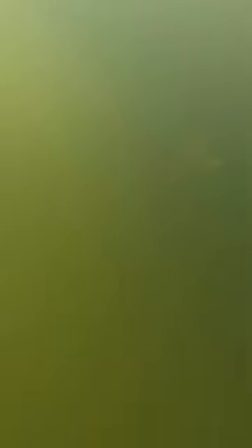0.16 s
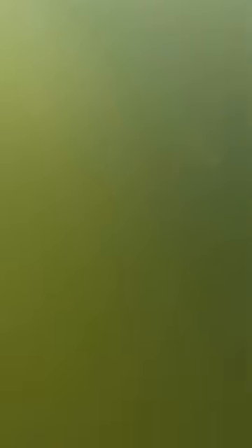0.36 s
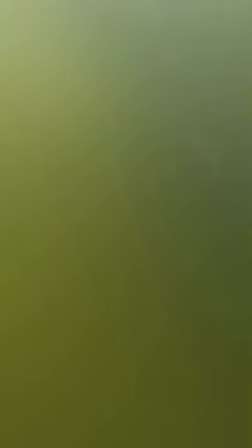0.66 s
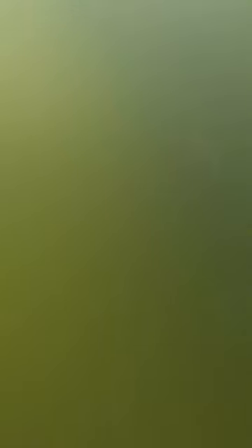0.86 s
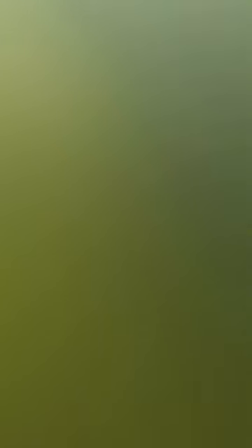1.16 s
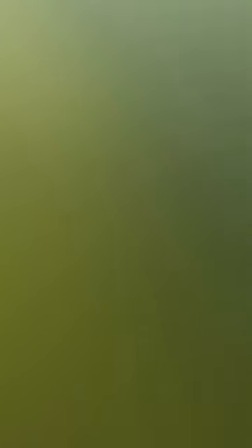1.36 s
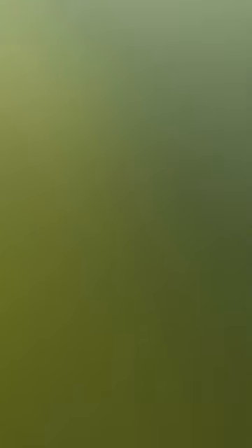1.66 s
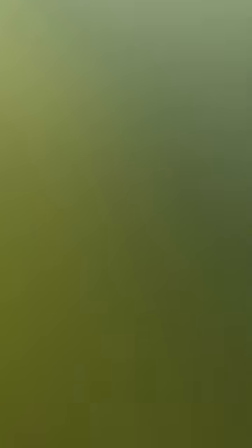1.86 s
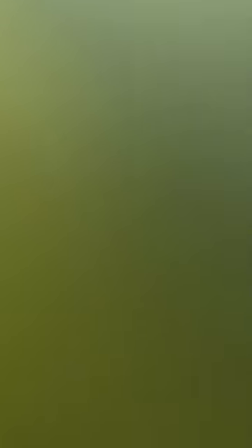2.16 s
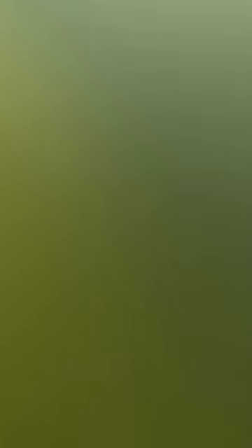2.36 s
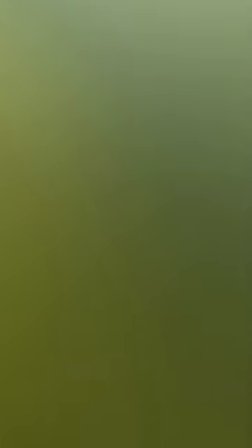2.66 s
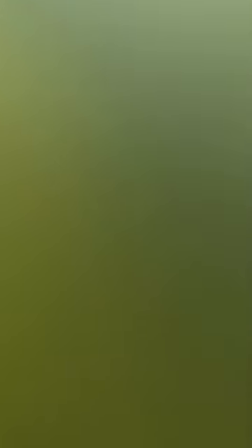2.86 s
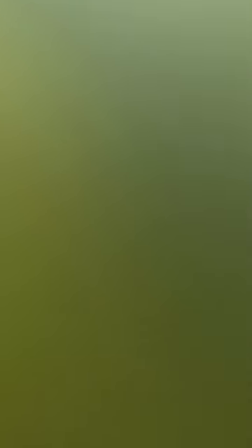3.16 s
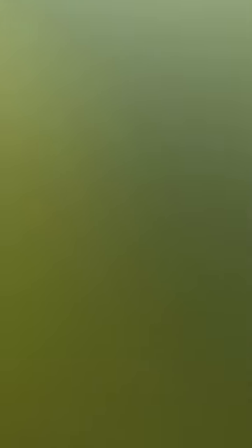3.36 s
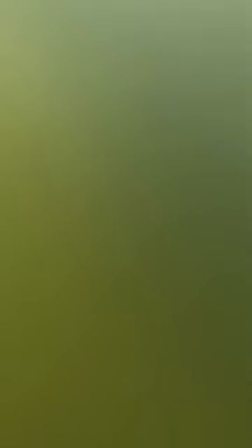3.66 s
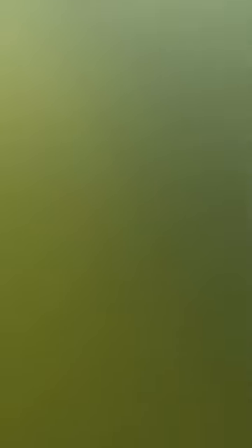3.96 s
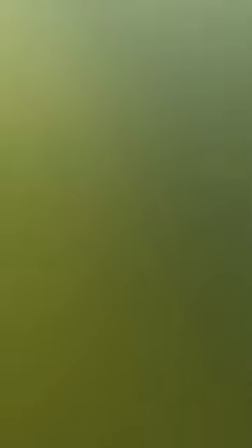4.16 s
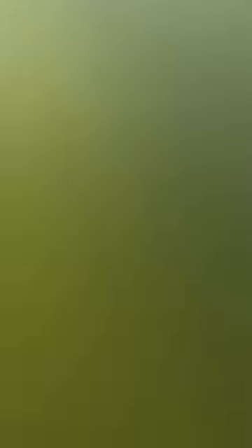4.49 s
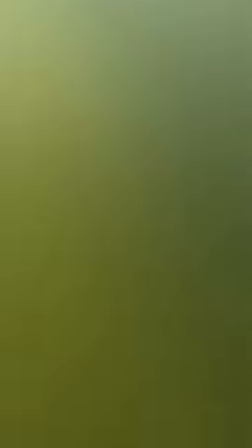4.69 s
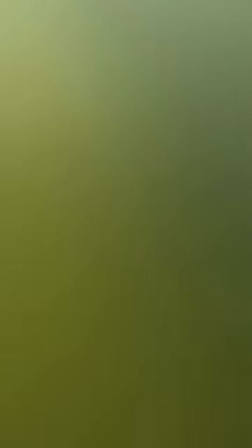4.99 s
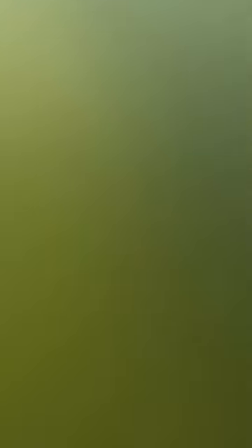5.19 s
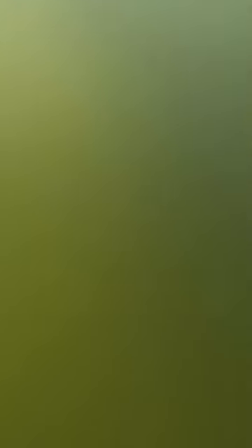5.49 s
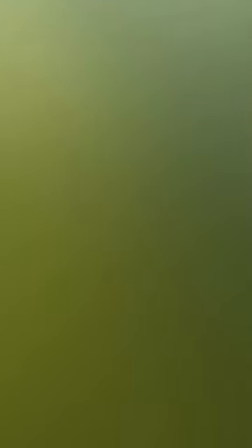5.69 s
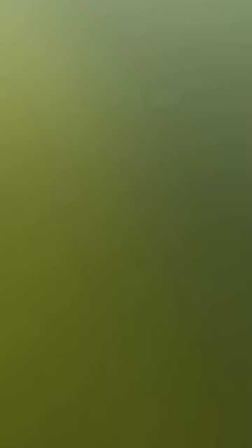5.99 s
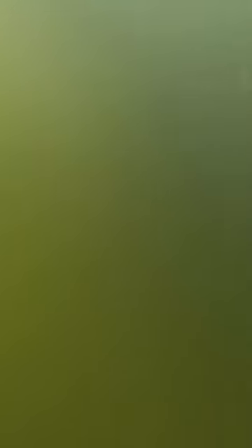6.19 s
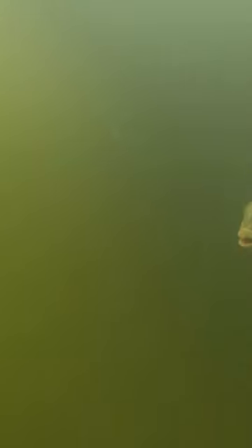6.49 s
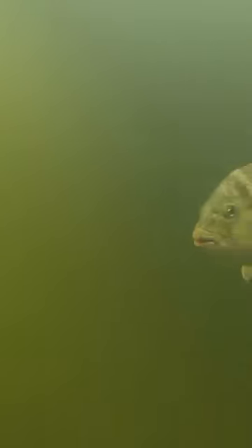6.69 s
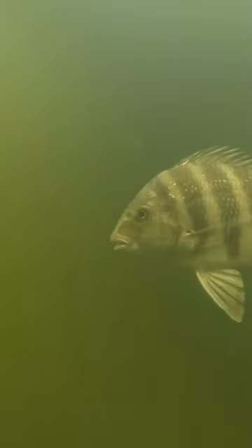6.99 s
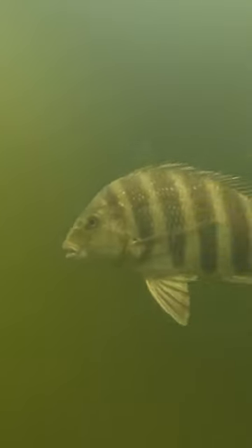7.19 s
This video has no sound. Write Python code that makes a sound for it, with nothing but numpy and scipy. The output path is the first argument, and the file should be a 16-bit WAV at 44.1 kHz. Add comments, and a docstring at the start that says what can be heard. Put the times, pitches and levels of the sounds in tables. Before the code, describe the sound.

Inside a submerged camera housing: quiet hollow hum, soft rumble, crisp snaps near and far, dull ringing knocks, a tap flurry, then a deep bump.

```python
"""A camera in a sealed housing sits in murky, shallow water, faintly hissing and whining.
The flow drives the housing's resonances as filtered noise and a wavering tone, with rumble and rocking below.
From the start, knocks ring its damped modes and shrimp snap near and far; soft purrs and hard taps follow.
Then the water surges, the wall is lightly rubbed, and a heavy bump rebounds amid softer shoves.
Late on come two faint 2.7 kHz pings, damped sine waves, the second with a snap."""
import sys
import numpy as np
from scipy import signal
from scipy.fft import rfft, irfft
from scipy.io import wavfile
from scipy.ndimage import uniform_filter1d

SR = 44100
rng = np.random.default_rng(int(sys.argv[2]) if len(sys.argv) > 2 else 0)


def waveform_to_disk(signal):
    """Save audio, clipped to [-1, 1], as 16-bit WAV at the path in sys.argv[1]."""
    frames = np.transpose(np.atleast_2d(signal))
    scaled = np.clip(frames, -1, 1) * 32767
    samples = np.round(scaled).astype(np.int16)
    wavfile.write(sys.argv[1], SR, samples)


N = 323694
TIME = np.arange(N) / SR
AGE = TIME[:SR // 4]  # time since a blow [s]

# All levels in the tables are relative: the functions that use them may add trims.
# water flowing round the housing: (time [s], hum level [dB], low wash level [dB])
FLOW = [(0.0, -58, -57.5), (0.2, -60, -61), (0.62, -67, -60), (1.0, -63.5, -61.5), (1.55, -62.5, -60.5),
        (2.15, -67.5, -67), (2.85, -65.5, -64.5), (3.3, -69, -67.5), (3.65, -57, -65), (4.2, -67, -63.5),
        (4.8, -65.5, -67.5), (5.85, -68.5, -67.5), (6.6, -71.5, -68), (7.34, -64.5, -70)]
# upper modes of the housing: (frequency [Hz], level [dB], T60 [s])
UPPER_MODES = [(590, -9.5, 0.1), (710, -4, 0.069), (852, 0.5, 0.031), (942, -5, 0.027)]
# clinking modes of the housing wall: (frequency [Hz], level [dB], T60 [s])
CLINK_MODES = [(1471, 10.5, 0.034), (1426, -3.5, 0.16), (1190, -6.5, 0.019), (1570, -9, 0.0047),
               (2080, -15, 0.024), (2810, -5.5, 0.02)]
# spectrum of a sharp crack: (frequency [Hz], density [dB per Hz])
CRACK_SPECTRUM = [(3600, -51), (4900, -3), (6000, -1.5), (7100, -1.5), (8400, -9), (10500, -28)]
# spectrum of the rustling wall: (frequency [Hz], density [dB per Hz])
SCUFF_SPECTRUM = [(800, -11), (1200, -10), (1400, 8), (1750, -7.5), (2030, 1), (2400, -22), (3500, -24)]


def amp(db):
    """Decibel definition: amplitude gain is ten to the power of dB / 20."""
    return 10 ** (np.asarray(db) / 20)


def unit(x):
    """Normalisation by energy: scales to an rms of one."""
    return x / np.sqrt(np.mean(x ** 2) + 1e-30)


def read(points, hz):
    """Logarithmic frequency scale: interpolates a table along it."""
    f, value = np.transpose(points)
    return np.interp(np.log(hz + 1), np.log(f + 1), value)


def level(rows, index=1):
    """Amplitude envelope: gain over time from one dB column of a curve."""
    rows = np.array(rows)
    return amp(np.interp(TIME, rows[:, 0], rows[:, index]))


def add(mix, s, sound):
    """Linear superposition: mixes a sound in at time s."""
    part = mix[..., max(round(s * SR), 0):][..., :sound.shape[-1]]
    part += sound[..., :part.shape[-1]]


def swells(rows, taper):
    """Amplitude envelope: gain over time for rows of (start, end, dB), each fading in and out."""
    gain = np.zeros(N)
    for start, end, db in rows:
        samples = max(round((end - start) * SR), 2)
        add(gain, start, amp(db) * signal.windows.tukey(samples, taper))
    return gain


def noise(spectrum, same, size=N, lag=0):
    """Partial coherence: coloured stereo noise; same is the sides' likeness, lag the left's delay [rad]."""
    hz = np.fft.rfftfreq(size, 1 / SR)
    mid, side = rfft(rng.standard_normal((2, size)))
    same = np.clip(same, -1, 1)
    mid = mid * np.sqrt(1 + same)
    side = side * np.sqrt(1 - same)
    rolloff = 1 + (hz / spectrum[-1][0]) ** 4  # falls away above the table's end
    colour = amp(read(spectrum, hz)) / rolloff
    left, right = (mid + side) * np.exp(-1j * lag), mid - side
    return unit(irfft(np.array([left, right]) * colour, size))


def ports(z, left_db, lead=0):
    """Level and phase differences: a complex vibration, left_db louder and lead [rad] earlier at the left."""
    tilt = amp(left_db / 2) * np.exp(.5j * lead)
    return np.array([(z * tilt).real, (z / tilt).real])


def struck(modes, rise):
    """Modal decay: modes die exponentially after a blow that builds over rise [s]; complex, peak one."""
    z = sum(amp(db - 60 * AGE / t60) * np.exp(2j * np.pi * hz * AGE) for hz, db, t60 in modes)
    z = -1j * z * (1 - np.exp(-(AGE / rise) ** 2))
    return z / abs(z).max()


def wobble(hz, half):
    """Gaussian wave packet: a few cycles under a bell, centred in the span of AGE; complex."""
    t = AGE - AGE.mean()
    return np.exp(-(t / half) ** 2 + 2j * np.pi * hz * t)


def burst(spectrum, t60, tail_db, tail_t60, same, rise=0.0019):
    """Cavitation and scattering: a click with a dense head, and a weak tail from bed and surface."""
    head = amp(-60 * AGE / t60)
    tail = amp(tail_db - 60 * AGE / tail_t60)
    shape = (head + tail) * (1 - np.exp(-AGE / rise))
    return noise(spectrum, same, size=len(AGE)) * shape / shape.max()


def electronics(hiss_db=-64.5, skirt_hz=150):
    """Phase modulation: a whine flutters at the camera's frame rate, amid a random-phase skirt and hiss."""
    whine_hz, frame_hz, flutter_rad = 4496, 30, 1.35
    # spectrum of the hiss: (frequency [Hz], density [dB per Hz])
    hiss_spectrum = [(100, 9), (600, 3), (1000, -7), (1430, 2), (1700, -2), (2050, 3), (2700, -6),
                     (3200, 1), (4200, -12.5), (5400, 0), (6700, -4.5), (8100, -14), (12400, -23.5),
                     (14000, -34)]
    # likeness of the two microphones: (frequency [Hz], likeness [0-1])
    hiss_likeness = [(100, 0.14), (900, 0.23), (1450, 0.95), (2100, 0.4), (2800, 0.55), (3300, 0.55),
                     (4100, 0.22), (5400, 0.96), (9000, 1)]
    # delay of the left microphone: (frequency [Hz], phase [rad])
    hiss_lag = [(500, 0.069), (750, 0.87), (1100, 1.37), (1450, 0.7), (2750, 0.83), (4300, 0.14)]
    # whine: (harmonic number [-], tone level [dB], fuzzy skirt level [dB])
    whine = [(1, -88, -83.5), (2, -94, -93)]
    hz = np.fft.rfftfreq(N, 1 / SR)
    out = amp(hiss_db) * noise(hiss_spectrum, same=read(hiss_likeness, hz), lag=read(hiss_lag, hz))
    flutter = flutter_rad * np.sin(2 * np.pi * frame_hz * TIME)
    for harmonic, tone_db, skirt_db in whine:
        phase = 2 * np.pi * harmonic * whine_hz * TIME
        # a random walk of phase spreads the line over skirt_hz
        jitter = np.cumsum(rng.standard_normal(N)) * np.sqrt(2 * np.pi * skirt_hz / SR)
        out += amp(tone_db) * unit(np.sin(phase + flutter))
        out += amp(skirt_db) * unit(np.sin(phase + jitter))
    return out


def hum_core(swell_db=2.5):
    """Flow-sustained resonance: the main mode sings on, drifting a little in pitch and level."""
    tone_hz, drift_hz = 405, 4.5
    drift, swell = (unit(uniform_filter1d(row, size=3000)) for row in rng.standard_normal((2, N)))
    phase = 2 * np.pi * np.cumsum(tone_hz + drift_hz * drift) / SR
    return unit(np.sin(phase) * amp(swell_db * swell))


def water(count=16):
    """Turbulent excitation: flow drives the resonances, rumble and rocking; eddies swell wash and rocking."""
    slowest_hz, fastest_hz = 1.182, 6.4  # range of eddy rates
    wash_eddy_db, rock_eddy_db = 0.5, 3.5  # rms depth of the swells
    # spectra of the four noises: (frequency [Hz], density [dB per Hz])
    hum_spectrum = [(230, -48), (310, -14.5), (345, -10.5), (388, -5), (405, 4), (427, -1), (455, -8),
                    (500, -19), (600, -24), (720, -70), (1000, -64.5)]
    wash_spectrum = [(60, -13), (110, -25.5), (135, -5.5), (165, -0.5), (195, -6), (230, -8.5),
                     (280, -17.5), (400, -29), (700, -50)]
    rumble_spectrum = [(10, -15), (24, 2.5), (34, -8), (48, -11), (68, -18), (110, -29), (250, -66)]
    rocking_spectrum = [(1.5, -5), (3.5, 1.5), (7, 1), (12, -16), (20, -34)]
    # low rumble, in short flurries: (time [s], level [dB])
    rumble_level = [(0.0, -65), (0.2, -69), (0.55, -53.5), (0.92, -69), (1.15, -55), (1.5, -61.5),
                    (1.75, -52), (2.4, -54), (2.85, -71.5), (3.05, -58), (3.35, -74), (3.72, -53),
                    (4.15, -78), (4.65, -64), (5.22, -67), (5.42, -61), (6.1, -66.5), (6.35, -52.5),
                    (6.6, -78), (6.88, -52), (7.1, -62), (7.34, -79)]
    # slow rocking of the camera: (time [s], level [dB])
    sway = [(0.0, -52), (1.3, -50), (2.1, -44.5), (2.6, -54), (5.7, -54.5), (7.34, -52)]
    rates = np.geomspace(slowest_hz, fastest_hz, count)
    eddies = unit(sum(np.sin(2 * np.pi * (hz * TIME + rng.random())) for hz in rates))
    hum = amp(4.5) * noise(hum_spectrum, same=0.95) + amp(3) * hum_core()
    hum = hum * level(FLOW, index=1) * amp([[.3], [-.3]])  # left, right
    wash = noise(wash_spectrum, same=0.81) * level(FLOW, index=2) * amp(1.5 + wash_eddy_db * eddies)
    rumble = noise(rumble_spectrum, same=0.96) * level(rumble_level)
    rocking = noise(rocking_spectrum, same=0.99) * level(sway) * amp(rock_eddy_db * eddies)
    return hum + wash + rumble + rocking


def knocks(cut_hz=135, count=6):
    """Impulsive modal excitation: dull blows ring the housing; the flow adds light nudges at random."""
    press_db_per_s = 255  # extra damping while something soft and heavy presses on the wall
    # upper modes under a usual knock, and the share of its extra dB that they follow
    upper_db, usual_knock_db, upper_follows = -60, -33, 0.81
    nudge_over_hum_db, nudge_body_db, nudge_rise_s = 17.5, -51.5, 0.0053
    # blows: (time [s], main ring level [dB], low body level [dB], build-up [s], ring pitch [Hz])
    blows = [(0.036, -34, -46.5, 0.012, 396.4), (0.065, -34, -56, 0.012, 410),
             (0.5026, -22, -31, 0.0052, 395), (0.747, -39.5, -62, 0.0063, 408),
             (0.825, -42.5, -69, 0.009, 407), (1.288, -42.5, -66, 0.0082, 404),
             (1.314, -36.5, -65, 0.014, 402), (1.355, -26.5, -66, 0.011, 408.4),
             (1.487, -43, -58, 0.01, 402), (2.4585, -34.5, -49, 0.003, 403),
             (2.4688, -20.5, -22.5, 0.0051, 414), (2.714, -44, -52, 0.013, 402),
             (2.749, -45.5, -66, 0.004, 404), (2.916, -45.5, -53.5, 0.011, 378),
             (3.133, -42.5, -62, 0.0062, 405.3), (3.27, -48.5, -65, 0.0079, 415),
             (3.464, -46, -73, 0.005, 418), (3.713, -45, -67, 0.004, 398), (3.812, -43, -60, 0.0041, 397),
             (3.97, -45, -49, 0.0045, 399), (3.989, -38, -53, 0.0038, 397), (4.097, -75, -74, 0.018, 380),
             (4.199, -45, -57, 0.03, 408), (4.279, -52, -66, 0.015, 391), (4.72, -50.5, -55.5, 0.0099, 400),
             (5.176, -42, -52, 0.009, 400), (5.309, -32.5, -41.5, 0.0037, 395.6),
             (5.328, -37.5, -46, 0.0093, 401), (6.818, -56, -81, 0.017, 398), (6.983, -50, -75, 0.015, 402),
             (7.164, -48, -61, 0.0094, 407), (7.258, -50, -71, 0.014, 410.7),
             (7.304, -50.5, -68, 0.017, 382)]
    # main and low modes of the housing: (frequency [Hz], level [dB], T60 [s])
    ring_modes = [(401.4, -7, 0.15), (382.6, 0.5, 0.046)]
    body_modes = [(189, 1.5, 0.079), (219.2, 0, 0.12), (305, -1, 0.081)]
    main_hz = ring_modes[0][0]
    flow_s, flow_db, _ = np.transpose(FLOW)
    nudges = []
    for s in rng.random(count) * N / SR:
        nudge_db = np.interp(s, flow_s, flow_db) + nudge_over_hum_db
        nudges.append((s, nudge_db, nudge_body_db, nudge_rise_s, main_hz))
    ring, body = np.zeros((2, N), complex)
    for s, ring_db, body_db, rise, hz in blows + nudges:
        detune = np.exp(2j * np.pi * (hz - main_hz) * AGE)
        pressed = amp(-press_db_per_s * amp(body_db - ring_db) * AGE)
        add(ring, s, amp(ring_db) * struck(ring_modes, rise) * detune * pressed)
        overtone_db = upper_db + upper_follows * (ring_db - usual_knock_db)
        add(ring, s, amp(overtone_db) * struck(UPPER_MODES, rise / 2))
        add(body, s, amp(body_db + 1.0) * struck(body_modes, rise / 2))
    # so light a blow flexes the shell without moving the whole camera
    body = signal.sosfilt(signal.butter(4, cut_hz, "high", fs=SR, output="sos"), body + 1e-12)
    return ports(ring + body, left_db=1.6)


def snap(crack_db, low_hz, low_db, high_hz, high_db, middle_db, shell_db, clink_db):
    """Cavitation exciting a structure: a crack and two brief pings, then the housing wall's answer."""
    # spectra of the crack's fizz and middle band: (frequency [Hz], density [dB per Hz])
    fizz_spectrum = [(7000, -8.5), (9000, -3.5), (10500, -8.5), (12000, -14), (13700, -14.5), (15000, -40)]
    middle_spectrum = [(600, -9), (1100, -38), (2000, -3), (2400, 0.5), (2750, 2.5), (3150, -5.5),
                       (3800, 0), (4400, -3), (6000, -18)]
    # ringing modes of the shell: (frequency [Hz], level [dB], T60 [s])
    shell_modes = [(2000, 8, 0.034), (2050, 1, 0.097), (2690, 1, 0.034), (3660, -17, 0.011)]
    x = amp(crack_db - 9.0) * burst(CRACK_SPECTRUM, t60=0.021, tail_db=-8.0, tail_t60=0.097,
                                    same=0.96, rise=0.00052)
    x += amp(crack_db - 10.5) * burst(fizz_spectrum, t60=0.009, tail_db=-19.5, tail_t60=0.12,
                                      same=0.83, rise=0.00065)
    x += amp(low_db) * ports(struck([(low_hz, 0, .011)], rise=0.00041), left_db=-4.5, lead=.2)
    x += amp(high_db) * ports(struck([(high_hz, 0, .012)], rise=0.00015), left_db=-1.5, lead=0.14)
    x += amp(middle_db - 2.0) * burst(middle_spectrum, t60=0.021, tail_db=-13.0, tail_t60=0.17,
                                      same=0.3, rise=0.00098)
    shell = ports(struck(shell_modes, rise=0.00089), left_db=9.0, lead=0.93)
    add(x, .0007, amp(shell_db - 9.5) * shell)
    clink = ports(struck(CLINK_MODES, rise=0.0013), left_db=4.5, lead=0.4)
    add(x, .0021, amp(clink_db) * clink)
    # echoes from bed and surface keep the wall rustling a little longer
    x += amp(clink_db - 9) * burst(SCUFF_SPECTRUM, t60=.025, tail_db=-8, tail_t60=.18, same=.6, rise=.0005)
    return x


def shrimp(count=14):
    """Impulsive cavitation sources: near snaps, and a scatter of far ones barely over the hiss."""
    faintest_db, spread_db = -69, 7  # faintest far snap, and the range above it
    far_ping_db, far_wall_db = 0.5, -9  # against a far snap's crack
    # near snaps: (time [s], crack level [dB], low ping frequency [Hz], low ping level [dB],
    # high ping frequency [Hz], high ping level [dB], middle band level [dB], shell ring level [dB],
    # wall clink level [dB])
    near = [(0.0597, -37.5, 5800, -38.5, 6940, -37, -49.5, -50, -52),
            (0.0908, -57, 5050, -57, 6410, -55, -66, -61, -78),
            (0.221, -50, 5720, -53, 7140, -47.5, -54, -60, -48.5),
            (0.52, -49.5, 5900, -59, 6960, -44, -72, -74, -56),
            (0.659, -71, 5200, -55, 6900, -57, -51.5, -49, -52),
            (1.055, -53, 4750, -53, 7300, -59, -53.5, -47, -55),
            (1.1867, -41, 5570, -49, 7050, -57, -52, -47, -42),
            (1.3547, -54, 5710, -61, 6980, -47.5, -58, -60, -56),
            (1.4173, -52.5, 4880, -49, 6960, -48, -49, -39, -43.5),
            (1.712, -49.5, 5550, -60, 7200, -43.5, -56, -66, -63),
            (1.7806, -51.5, 5550, -70, 6950, -50.5, -76, -78, -80),
            (1.9813, -51.5, 4650, -57.5, 7350, -70, -53, -53, -49),
            (2.2345, -45.5, 4480, -51, 7360, -49, -55.5, -57, -43),
            (2.3257, -47.5, 4870, -45, 7100, -48.5, -48, -63, -52),
            (2.369, -54, 5800, -75, 7400, -69, -81, -78, -77),
            (3.002, -51, 5800, -57, 7000, -45, -65, -69, -56),
            (4.772, -58, 4630, -56, 6930, -55, -60, -59, -66),
            (4.808, -49, 5200, -54, 7300, -51, -70, -70, -72),
            (4.811, -51, 5830, -50, 6920, -48, -53, -62, -52),
            (5.0219, -45.5, 5050, -44, 7140, -45, -44, -56, -47.5),
            (5.215, -52, 5800, -68, 7500, -70, -63, -70, -67),
            (5.348, -54, 5450, -64, 6910, -48.5, -64, -64, -78),
            (5.6046, -53, 5820, -68, 6900, -60, -61, -72, -80),
            (6.1823, -48, 6000, -60, 7300, -48, -53.5, -54, -58.5),
            (6.6586, -58, 5600, -54, 7210, -52, -61, -63, -70),
            (6.677, -64, 5630, -70, 6630, -70, -63, -65, -51),
            (6.8361, -57, 5060, -49, 6920, -53, -49.5, -34.5, -46),
            (7.152, -45.5, 6100, -56, 7000, -40.5, -57.5, -41, -47.5)]
    # far snaps that stand out of the hiss: (time [s], level [dB])
    distinct = [(1.667, -60), (1.8078, -63), (1.8425, -59), (4.2494, -64), (4.954, -61), (5.875, -58.5),
                (6.2507, -58), (7.3108, -60)]
    faint = [(when * N / SR, faintest_db + spread_db * size) for when, size in rng.random((count, 2))]
    far = []
    for s, db in distinct + faint:
        low, high = rng.random(2)
        ping_db, wall_db = db + far_ping_db, db + far_wall_db
        low_hz, high_hz = 4500 + 1600 * low, 6500 + 900 * high
        far.append((s, db, low_hz, ping_db, high_hz, ping_db, wall_db, wall_db, wall_db))
    out = np.zeros((2, N))
    for s, *row in near + far:
        add(out, s, snap(*row))
    return out


def purrs():
    """Band-limited noise under a smooth envelope: soft, narrow purrs in the water, equal in level."""
    length_s, purr_db = 0.292, -64.5
    # start of each purr: (time [s])
    starts = [.28, .755, 1.605, 2.22]
    # spectrum of a purr: (frequency [Hz], density [dB per Hz])
    purr_spectrum = [(520, -8.5), (690, -10), (780, -1), (880, -15.5), (1020, -22)]
    rows = [(s, s + length_s, purr_db) for s in starts]
    return noise(purr_spectrum, same=0.41) * swells(rows, taper=0.52)


def taps():
    """Contact damping: a brief pip, then a choked wall ring; cracks grow faster than the force."""
    damp_db_per_s = 650  # the touch itself damps the wall's ring
    reference_crack_db, reference_tap_db, crack_growth = -54, -24, 1.5  # growth: dB gained per dB of force
    # small hard taps: (time [s], pip level [dB], ring level [dB], pip pitch [Hz])
    touches = [(1.12, -54, -57, 1510), (1.9056, -46, -55, 1370), (1.9625, -32.5, -43, 1430),
               (1.9706, -31.5, -44, 1410), (2.0345, -25.5, -36, 1505), (2.055, -31, -39, 1440),
               (2.136, -52, -62, 1390), (2.175, -53, -61, 1420), (2.249, -42, -53, 1470),
               (2.4444, -33, -45, 1470), (2.4893, -42, -46, 1430), (2.912, -57, -63, 1470),
               (3.574, -51.5, -51, 1370), (4.369, -62, -57, 1460), (4.609, -58, -62, 1410),
               (4.799, -54.5, -56, 1490), (6.2761, -55.5, -68, 1500), (6.701, -55, -61, 1420),
               (7.262, -57, -56, 1430), (7.316, -58, -54, 1460)]
    out, cracks = np.zeros(N, complex), np.zeros((2, N))
    for s, db, ring_db, hz in touches:
        add(out, s + 0.00109 - AGE.mean(), amp(db + 0.5) * wobble(hz, half=.001))
        add(out, s + 0.00246, amp(ring_db - damp_db_per_s * AGE) * struck(CLINK_MODES, rise=0.00013))
        add(out, s + 0.00084, amp(db - 27.0) * struck(UPPER_MODES, rise=0.0031))
        crack_db = reference_crack_db + crack_growth * (db - reference_tap_db)
        crack = burst(CRACK_SPECTRUM, t60=0.017, tail_db=-21.5, tail_t60=.05, same=0.81, rise=0.0007)
        add(cracks, s, amp(crack_db) * crack)
    return ports(out, left_db=3.0, lead=1.0) + cracks


def surge():
    """Pressure reversal: among the taps the water pulls at the camera, then turns sharply and pushes."""
    middle_s, surge_db, turn_s, length_s = 2.024, -30, .008, .065
    t = TIME - middle_s
    return amp(surge_db) * np.tanh(t / turn_s) * np.exp(-(t / length_s) ** 2)


def rub():
    """Frictional noise: irregular grain modulates a fine rasp on the wall, mostly between the taps."""
    # light strokes along the housing: (start [s], end [s], level [dB])
    strokes = [(2.016, 2.027, -54), (2.027, 2.034, -53), (2.058, 2.078, -55), (2.134, 2.222, -62.5),
               (2.235, 2.284, -65), (2.284, 2.31, -54.5), (2.478, 2.52, -62), (3.112, 3.156, -64.5),
               (3.795, 3.835, -67), (3.963, 3.995, -67), (4.845, 4.868, -67)]
    grain_db = 3 * unit(uniform_filter1d(rng.standard_normal(N), size=110))
    rasp = unit(noise(SCUFF_SPECTRUM, same=0.84) * amp(grain_db))
    return rasp * swells(strokes, taper=0.096) * amp([[-.5], [-2.5]])  # left, right


def jolt():
    """Damped oscillation on a mount: after a soft first pull the camera heaves and rebounds."""
    lead_in_s, lead_in_db, lead_in_length_s = 2.4615, -32, .007
    heave_db, heave_rise_s = -24, 0.032
    jolt_rise_s, jolt_t60_s = 0.0036, 0.024
    # the heavy bump and its rebounds: (time [s], level [dB], pitch [Hz])
    rebounds = [(2.4655, -12, 119), (2.481, -18, 126), (2.4949, -16.5, 144), (2.506, -22.5, 149),
                (2.5127, -30, 147), (2.531, -42, 150)]
    # heaving modes of the camera: (frequency [Hz], level [dB], T60 [s])
    heave_modes = [(68.4, 0, 0.1), (31.8, -1, 0.08)]
    out = -amp(lead_in_db) * np.exp(-((TIME - lead_in_s) / lead_in_length_s) ** 2)
    add(out, rebounds[0][0], amp(heave_db) * struck(heave_modes, heave_rise_s).real)
    for s, db, hz in rebounds:
        add(out, s, amp(db) * struck([(hz, 0, jolt_t60_s)], jolt_rise_s).real)
    return out


def bumps():
    """Heavy damping by water: soft shoves sag in pitch and die soon; both microphones move together."""
    rise_s, t60_s, sag_hz_per_s = 0.0096, 0.055, 280
    # soft shoves, the first within the heavy bump: (time [s], level [dB], starting pitch [Hz])
    shoves = [(2.4816, -25, 94), (2.588, -36, 152), (2.719, -36.5, 152), (2.79, -47, 145),
              (4.041, -44.5, 164), (4.286, -48, 136), (4.305, -57, 85)]
    out = np.zeros(N)
    sag = np.exp(-1j * np.pi * sag_hz_per_s * AGE ** 2)
    for s, db, hz in shoves:
        add(out, s, amp(db) * (struck([(hz, 0, t60_s)], rise_s) * sag).real)
    return out


def faint_pings():
    """Single-mode decay: each faint ping is one damped sine wave."""
    ping_hz, t60_s = 2745, .035
    # faint pings, the second with a snap: (time [s], level [dB])
    pings = [(4.707, -60), (6.183, -58)]
    out = np.zeros(N)
    for s, db in pings:
        add(out, s, amp(db) * struck([(ping_hz, 0, t60_s)], rise=0.0023).real)
    return out


def scene():
    """Linear superposition: everything that reaches the two microphones."""
    steady = electronics() + water()
    contacts = knocks() + taps() + rub() + jolt() + bumps()
    in_water = shrimp() + purrs() + surge()
    return steady + contacts + in_water + faint_pings()


def record(dry):
    """Band limitation: a linear-phase low-pass filter sets the recorder's upper edge."""
    edge_hz = 15200
    lowpass = signal.firwin(511, edge_hz, window=("kaiser", 9), fs=SR)
    return signal.oaconvolve(dry, lowpass[None], "same")


dry = scene()
out = record(dry)
waveform_to_disk(out)
```